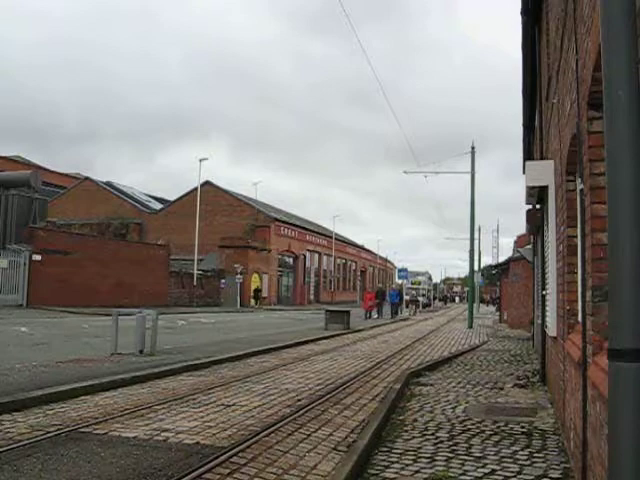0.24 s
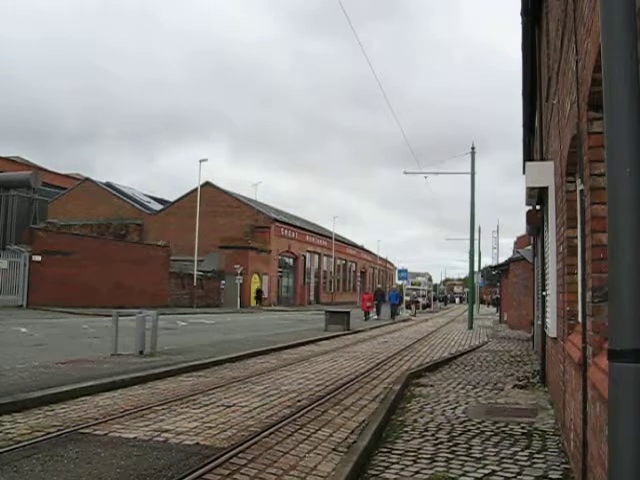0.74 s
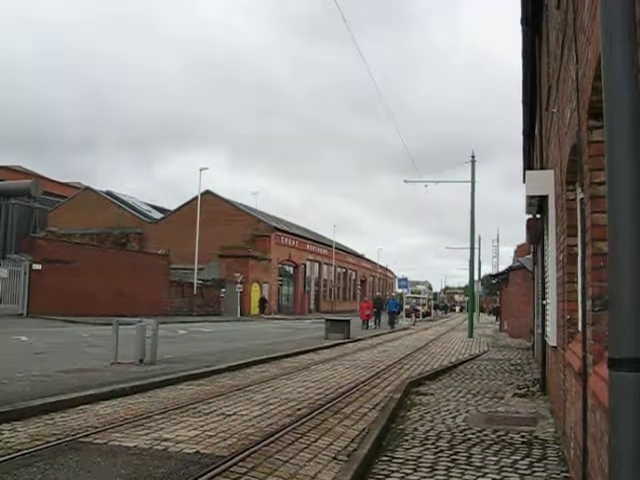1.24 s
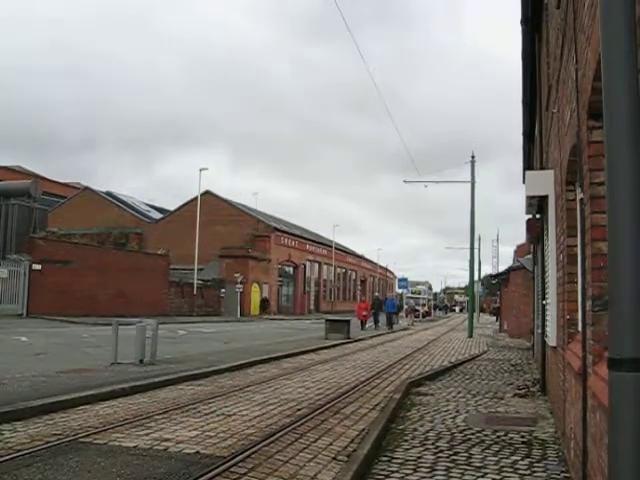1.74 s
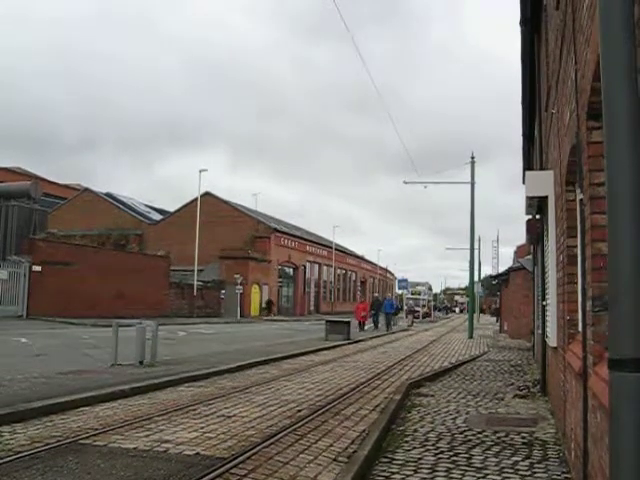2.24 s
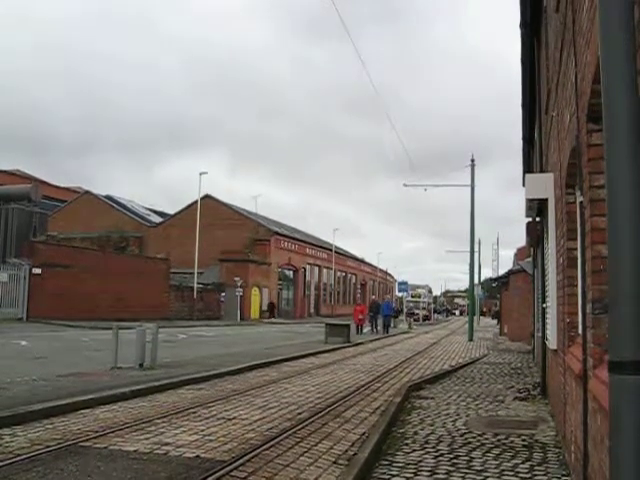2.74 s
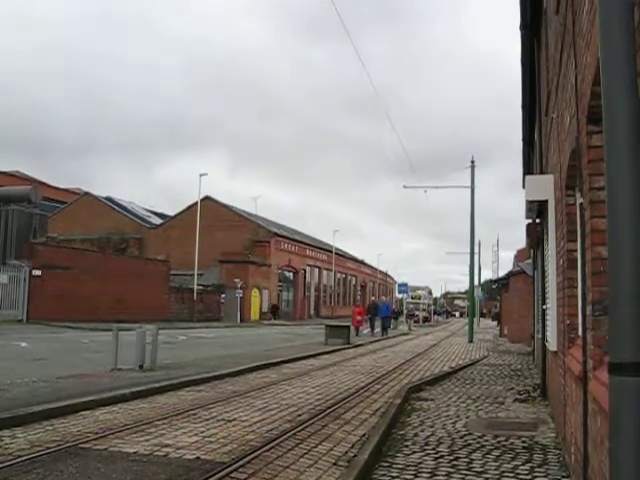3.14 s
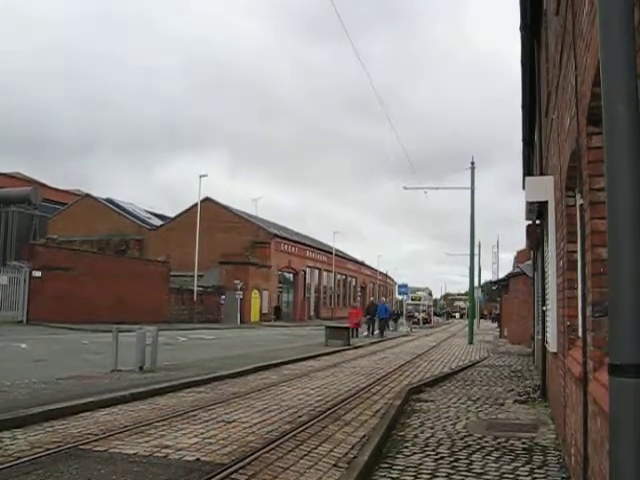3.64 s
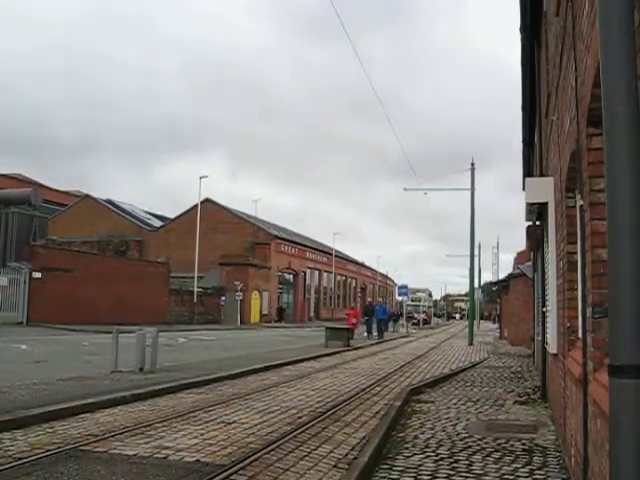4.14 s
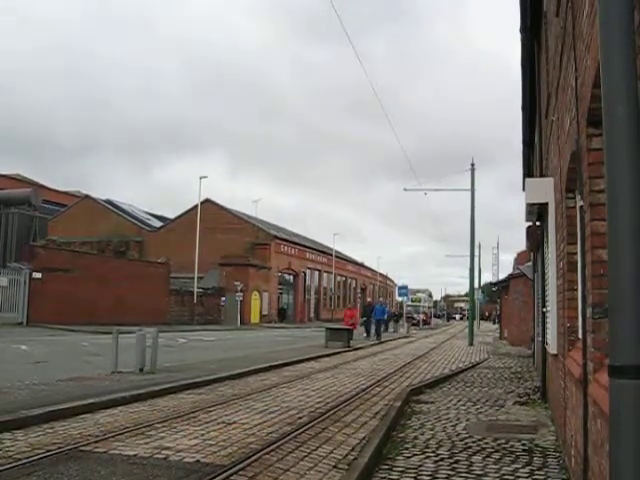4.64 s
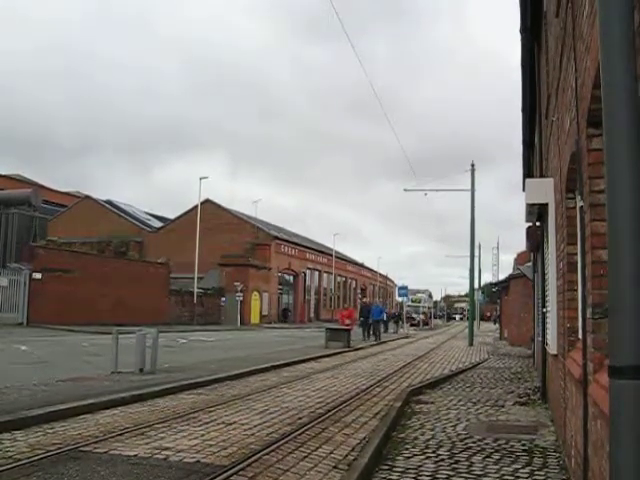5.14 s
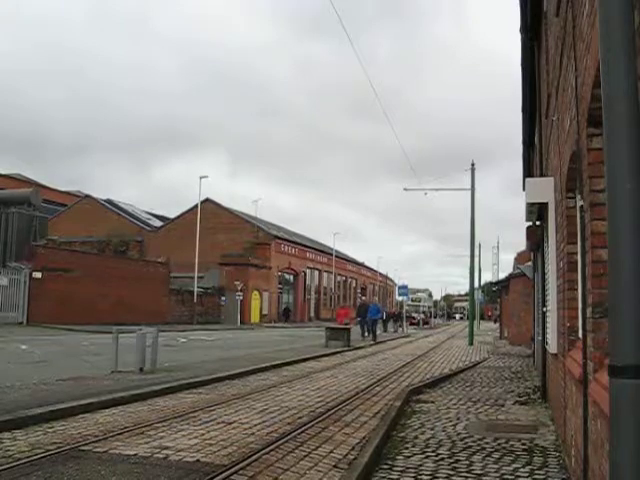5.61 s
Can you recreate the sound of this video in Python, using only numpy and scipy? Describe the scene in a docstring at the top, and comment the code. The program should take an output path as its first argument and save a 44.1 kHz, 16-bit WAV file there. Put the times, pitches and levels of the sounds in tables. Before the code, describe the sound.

Outdoors, wind rumbles and crackles on the microphone over a low electrical hum with a higher whine, far traffic and several light clicks.

```python
"""A substation hums throughout, its transformer core singing on multiples of twice the mains frequency,
over distant street traffic. From the start gusts buffet the microphone, sputtering hardest in the first
2.5 s. Small clicks sound close by, around 1 s and mostly from 3.9 to 5.2 s. One pop follows at 5.4 s,
then a faint brake squeal at 5.7 s. The small camera limits the peaks and keeps little treble."""
import sys
import numpy as np
from scipy.fft import rfft, irfft, next_fast_len
from scipy.io import wavfile
from scipy.ndimage import uniform_filter1d, minimum_filter1d, map_coordinates

SR = 44100
rng = np.random.default_rng(int(sys.argv[2]) if len(sys.argv) > 2 else 0)


def pcm_store(signal):
    """Save signal as 16-bit PCM."""
    levels = np.round(np.clip(np.atleast_2d(signal), -1, 1) * 32767)
    wavfile.write(sys.argv[1], SR, levels.astype(np.int16).T)


N = 258867
TIME = np.arange(N) / SR
POP_S = 5.396

# gusts on the microphone: start_s, length_s, rumble_db, crackle_db, dip_db
GUSTS = [(0.193, 0.026, -17, -38.5, 8.5), (0.304, 0.15, -27.5, -48, 5), (0.72, 0.087, -22.5, -45, 6),
         (0.82, 0.11, -24.5, -42.5, 13.5), (1.02, 0.14, -22.5, -38, 16), (1.218, 0.098, -21.5, -41.5, 10.5),
         (1.348, 0.16, -25, -43, 15), (1.552, 0.11, -25, -43, 12), (1.734, 0.08, -22, -39, 8.5),
         (1.88, 0.17, -26, -43, 10), (2.025, 0.043, -21.5, -35.5, 17), (2.16, 0.17, -26, -42, 4.5),
         (2.451, 0.077, -23, -41.5, 5), (2.738, 0.018, -29, -61, -3), (2.932, 0.17, -29, -62.5, 1),
         (3.222, 0.17, -27, -62, 2), (3.48, 0.025, -19.5, -54.5, 17.5), (3.604, 0.033, -19.5, -66, 2),
         (3.712, .08, -23, -66, -1.5), (3.917, 0.048, -34.5, -56, 3.5), (4.113, 0.084, -24, -51.5, 3),
         (4.265, 0.18, -23.5, -60.5, 2), (4.49, 0.1, -22.5, -58, 5), (4.656, 0.049, -22, -57, 3),
         (4.784, 0.036, -27, -52, 1), (5.032, .13, -24.5, -46.5, -2), (5.396, 0.19, -24.5, -56, 0),
         (5.738, 0.037, -28.5, -65, 1)]


def transformer(dip_db, core_hz=99.92, whine_dip_share=0.69):
    """The core flexes twice per mains cycle; its second order dominates. Cooling fans add faint tones."""
    # slow hum level: time_s, second_order_db, whine_db
    hum_levels = [(.05, -26.5, -43.5), (.65, -24.5, -40), (2.4, -23.5, -41.5), (2.95, -19.5, -34.5),
                  (3.7, -20, -37), (4.6, -22, -37.5), (5.3, -24.5, -37.5), (5.87, -19, -33)]
    # core orders in the whine: order, relative_db
    overtones = [(1, -1.5), (3, -5.5), (4, -7.5), (5, 0), (6, -2), (7, -10.5), (8, -10), (9, -10.5),
                 (10, -14.5), (11, -32.5), (13, -25), (24, -31)]
    # fan tones: pitch_hz, level_db
    fan_tones = [(558, -58.5), (624.5, -59.5), (709, -46.5), (3466, -71.5)]
    time_s, drone_db, whine_db = np.transpose(hum_levels)
    drone_gain = amp(np.interp(TIME, time_s, drone_db) - dip_db)
    whine_gain = amp(np.interp(TIME, time_s, whine_db) - whine_dip_share * dip_db)
    drone = tone(2 * core_hz, waver_db=0.7, drift_rad=0.037)
    whine = sum(amp(db) * tone(order * core_hz, waver_db=0.64, drift_rad=0.05) for order, db in overtones)
    fans = sum(amp(db) * tone(hz, waver_db=7, drift_rad=1) for hz, db in fan_tones)
    return drone_gain * drone + whine_gain * whine + amp(-dip_db) * fans


def wind(breeze_db=-31, lumps_db=1.5, spikes_db=5, rumble_trim_db=0.5, crackle_trim_db=1):
    """Gusts rumble on the microphone port in lumps; the strongest break into sputtering crackle."""
    # rumble spectrum: freq_hz, density_db
    rumble_spectrum = [(12, -23.5), (25, -10.5), (45, -1), (80, -1), (140, -3), (250, -8), (400, -13.5),
                       (700, -22), (1200, -38), (2500, -81.5)]
    # crackle spectrum: freq_hz, density_db
    crackle_spectrum = [(200, -38), (600, 2), (950, 3.5), (1600, 0), (2400, -11.5), (3100, -20),
                        (4000, -28.5), (6000, -67)]
    rumble = unit(noise(rumble_spectrum) * amp(lumps_db * wobble(24)))
    sputter = np.clip(wobble(260), -2, 1.5) + np.clip(wobble(70), -2, 1.5)
    crackle = coloured(rng.standard_normal(N) * amp(spikes_db * sputter), crackle_spectrum)
    rumble_gain, crackle_gain = np.full(N, amp(breeze_db)), np.zeros(N)
    for start_s, length_s, rumble_db, crackle_db, _ in GUSTS:
        gust = envelope(start_s, length_s, rise_s=0.032, fall_s=0.02)
        rumble_gain = np.maximum(rumble_gain, amp(rumble_db + rumble_trim_db) * gust)
        crackle_gain = np.maximum(crackle_gain, amp(crackle_db + crackle_trim_db) * gust)
    return rumble_gain * rumble + crackle_gain * crackle


def gust_dip(lag_s=0.037, hold_s=0.033):
    """Drop of hum and street under each gust, in dB: quickly down, briefly held, slowly back."""
    dips_db = [dip_db * envelope(start_s + lag_s, length_s + hold_s - lag_s, rise_s=0.015, fall_s=0.075)
               for start_s, length_s, _, _, dip_db in GUSTS]
    return np.max(dips_db, axis=0)


def eddies(thump_s=0.0059, crack_s=0.0063, lag_s=0.0015, ragged_db=4, crack_trim_db=-10, rasp_trim_db=1):
    """Each eddy hitting the port gives a dull thump, a ragged crack and, when fast, a rasp."""
    # hardest eddies: time_s, crack_db, rasp_db
    hits = [(0.166, -17, -56.5), (0.184, -20, -55), (.206, -16, -51), (.221, -5.5, -36),
            (0.295, -24.5, -59), (0.337, -16.5, -54), (.368, -23, -48), (0.382, -20.5, -45),
            (0.416, -28, -47.5), (0.873, -31, -32.5), (1.141, -19, -38.5), (1.156, -27, -40),
            (1.232, -18.5, -43), (1.255, -16.5, -47), (1.27, -14, -31), (1.285, -23, -37),
            (1.297, -18, -39), (1.377, -15, -36), (1.442, -24.5, -44.5), (1.482, -29, -58),
            (1.612, -19, -44), (1.72, -28, -57), (1.77, -24, -46), (1.787, -33, -33), (1.852, -29, -46),
            (2.031, -14, -35.5), (2.056, -11.5, -38), (2.092, -38, -49), (2.115, -30, -41.5),
            (2.178, -19.5, -37.5), (2.214, -14.5, -36), (2.264, -17, -32.5), (2.468, -22.5, -54),
            (2.509, -32, -52), (3.503, -23, -47.5)]
    # thump spectrum: freq_hz, density_db
    thump_spectrum = [(40, -35), (130, 0), (280, 6), (550, -1), (900, -7.5), (1600, -46)]
    # crack spectrum: freq_hz, density_db
    crack_spectrum = [(300, -22), (650, 4), (950, 4), (1500, 2.5), (2000, -11), (3000, -48.5)]
    # rasp spectrum: freq_hz, density_db
    rasp_spectrum = [(1000, -20), (1700, -0.5), (2300, 2), (3000, -7.5), (3800, -18.5), (6000, -40.5)]
    out, t = np.zeros(N), np.arange(-SR // 40, SR // 40) / SR
    flutter = rng.standard_normal(N) * amp(ragged_db * wobble(600))
    thump = noise(thump_spectrum)
    crack, rasp = coloured(flutter, crack_spectrum), coloured(flutter, rasp_spectrum)
    for time_s, crack_db, rasp_db in hits:
        start_s = time_s + lag_s + t[0]
        layers = [(thump, thump_s, -13 + 0.33 * crack_db),  # grows with the crack
                  (crack, crack_s, crack_db + crack_trim_db),
                  (rasp, crack_s, rasp_db + rasp_trim_db)]
        for source, fall_s, level_db in layers:
            swell = np.exp(-(t / np.where(t < 0, fall_s / 2, fall_s)) ** 2)
            puff = source[round(start_s * SR):][:len(t)] * swell
            add(out, start_s, amp(level_db) * unit(puff) * np.sqrt(np.mean(swell ** 2)))
    return out


def clicks(attack_share=0.045, ring_gain=0.79, snap_db=-29):
    """Each contact scratches around one damped resonance, with a faint wide snap; long ones start softer."""
    # close contacts: start_s, peak_db, pitch_hz, t60_s
    contacts = [(.976, -24.5, 4500, .008), (.978, -19.5, 2920, 0.012), (0.978, -14.5, 1300, 0.022),
                (.994, -19, 1100, 0.011), (1.027, -28, 3930, 0.011), (1.917, -36.5, 3700, 0.044),
                (3.941, -10.5, 1436, 0.015), (4.68, -22, 1247, .02), (4.693, -19.5, 1080, 0.027),
                (4.801, -17, 1330, 0.012), (4.82, -26.5, 1220, 0.012), (4.924, -39, 4150, 0.026),
                (5.046, -27.5, 3940, 0.034), (5.054, -33.5, 4500, 0.081), (5.088, -40, 4200, .05),
                (5.214, -34, 1890, 0.02)]
    out, t = np.zeros(N), np.arange(SR // 10) / SR
    for start_s, peak_db, pitch_hz, t60_s in contacts:
        width_hz = 350 + pitch_hz / 6
        scratch = filtered(rng.standard_normal(len(t)),
                           lambda hz: np.exp(-((hz - pitch_hz) / width_hz) ** 2)
                           + amp(snap_db) / (1 + (hz / pitch_hz / 2) ** 2))
        ring = ring_gain * np.sin(2 * np.pi * pitch_hz * t)
        attack = 1 - np.exp(-t / (attack_share * t60_s))
        click = (unit(scratch) + ring) * attack * amp(-60 * t / t60_s)
        add(out, start_s, amp(peak_db) * click / np.abs(click).max())
    return out


def street(dip_db, brake_hz=2520, brake_db=-56):
    """A wash of far traffic, a thin hiss that swells with it, and one distant brake squeal."""
    # traffic swell: time_s, level_db
    swell = [(.05, -38.5), (.7, -33), (2.4, -38), (3.1, -31.5), (3.8, -35.5), (4.9, -35), (5.6, -32)]
    # traffic spectrum: freq_hz, density_db
    traffic_spectrum = [(30, -1), (150, -0.5), (400, 1), (750, 2), (1000, -2), (1230, -11), (1650, -12),
                        (2100, -21), (3000, -28.5), (5000, -58)]
    # hiss spectrum: freq_hz, density_db
    hiss_spectrum = [(800, -21.5), (2000, 1.5), (2800, -0.5), (3450, 1.5), (3900, 0), (5100, -2.5),
                     (5500, -7.5), (6000, -17)]
    swell_db = np.interp(TIME, *np.transpose(swell))
    traffic = amp(swell_db - 0.6 * dip_db + wobble(9)) * noise(traffic_spectrum)
    hiss = amp(-32 + 0.59 * swell_db - 0.26 * dip_db) * noise(hiss_spectrum)
    braking = envelope(start_s=5.71, hold_s=0.1, rise_s=0.025, fall_s=0.025)
    squeal = amp(brake_db) * braking * tone(brake_hz, waver_db=3, drift_rad=4)
    return traffic + hiss + squeal


def tone(hz, waver_db, drift_rad, skip_s=0.0025):
    """Sine of rms 1; level and phase waver in the moving air. The phase skips once, at the pop."""
    clock_s = TIME + skip_s * (TIME >= POP_S)
    phase = 2 * np.pi * (hz * clock_s + rng.random()) + drift_rad * wobble(5.5)
    return unit(np.sin(phase) * amp(waver_db * wobble(3.6)))


def amp(db):
    """Decibels to gain."""
    return 10 ** (np.asarray(db) / 20)


def unit(x):
    """Scale to rms 1."""
    return x / np.sqrt(np.mean(x ** 2) + 1e-20)


def wobble(rate_hz):
    """Smooth random curve with knots at rate_hz."""
    return map_coordinates(rng.standard_normal(int(N * rate_hz / SR) + 4), [TIME * rate_hz])


def envelope(start_s, hold_s, rise_s, fall_s):
    """Reaches 1 at start_s, holds, then decays."""
    return np.exp(np.minimum(TIME - start_s, 0) / rise_s - np.maximum(TIME - start_s - hold_s, 0) / fall_s)


def filtered(x, response):
    """Apply the gain response(hz) to x."""
    size = next_fast_len(len(x) + 8192)
    return irfft(rfft(x, size) * response(np.fft.rfftfreq(size, 1 / SR)), size)[:len(x)]


def coloured(x, spectrum):
    """Shape x by (freq_hz, density_db) points, at rms 1."""
    freq_hz, density_db = np.transpose(spectrum)
    return unit(filtered(x, lambda hz: amp(np.interp(np.log(hz + 1), np.log(freq_hz), density_db))))


def noise(spectrum):
    """Coloured noise of rms 1."""
    return coloured(rng.standard_normal(N), spectrum)


def add(track, start_s, sound):
    """Mix a sound into the track."""
    part = track[round(start_s * SR):][:len(sound)]
    part += sound[:len(part)]


def scene():
    """All sources at one microphone; hum and street sink under the gusts."""
    dip_db = gust_dip()
    return (transformer(dip_db) + street(dip_db) + wind() + eddies() + clicks())[None]


def limiter(x, ceiling_db=-9):
    """Peaks over the ceiling briefly push the whole sound down."""
    gain = np.minimum(1, amp(ceiling_db) / (np.abs(x) + 1e-9))
    return x * uniform_filter1d(minimum_filter1d(gain, size=500), size=250)


def record(dry, band_hz=5850, top_hz=16800, on_s=0.045, fade_s=0.003, pop_db=-14, pop_decay_s=0.0017):
    """The camera limits peaks and cuts treble; the sound switches on, and pops once with a sharp step."""
    dull = filtered(limiter(dry[0]), lambda hz: 1 / (1 + (hz / band_hz) ** 50))
    gate = (TIME >= on_s) * np.clip((TIME[-1] - TIME) / fade_s, 0, 1)
    pop = amp(pop_db) * (TIME >= POP_S) * np.exp(-np.abs(TIME - POP_S) / pop_decay_s)
    return filtered(dull * gate + pop, lambda hz: 1 / (1 + (hz / top_hz) ** 80))[None]


dry = scene()
out = record(dry)
pcm_store(out)
```